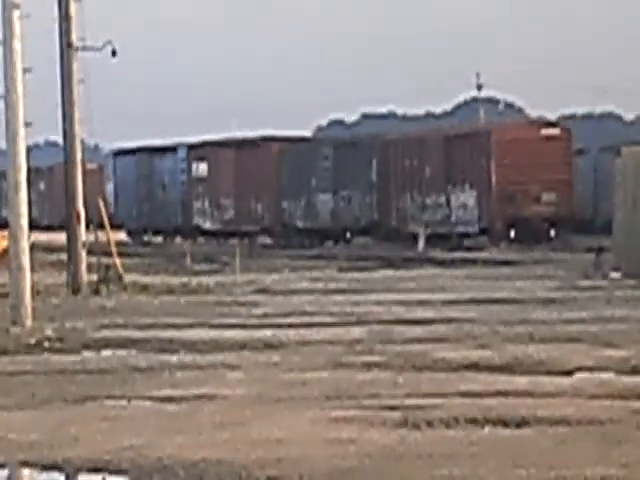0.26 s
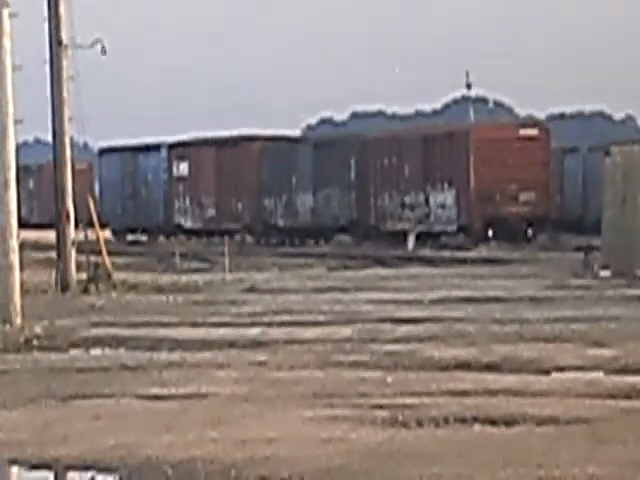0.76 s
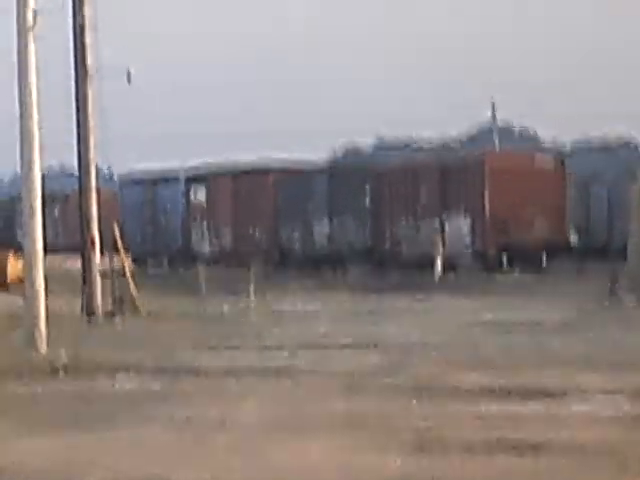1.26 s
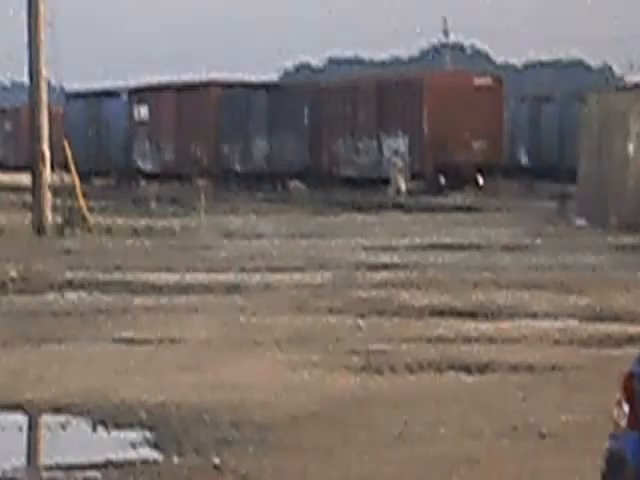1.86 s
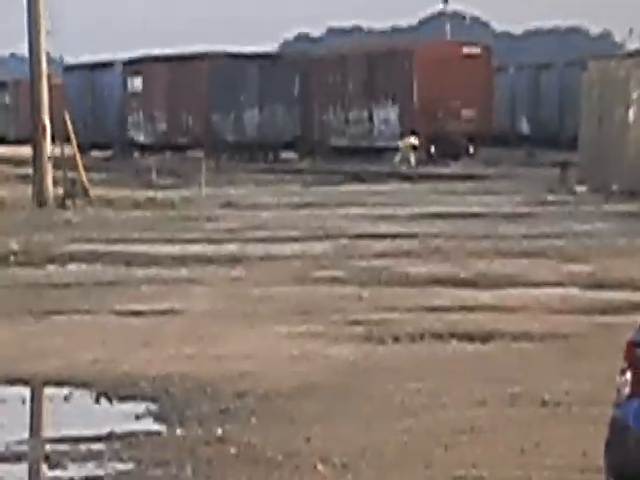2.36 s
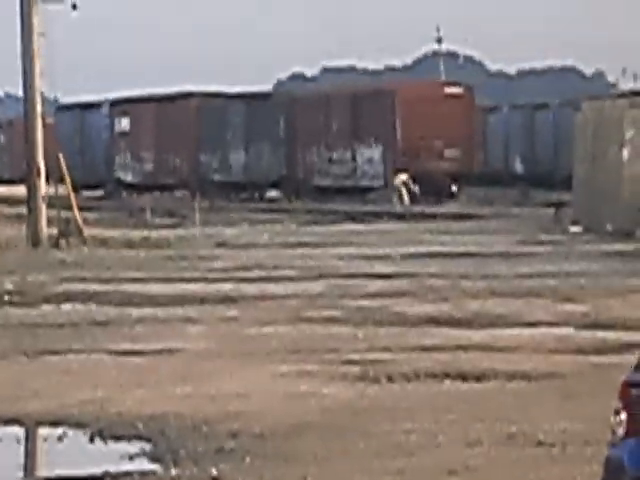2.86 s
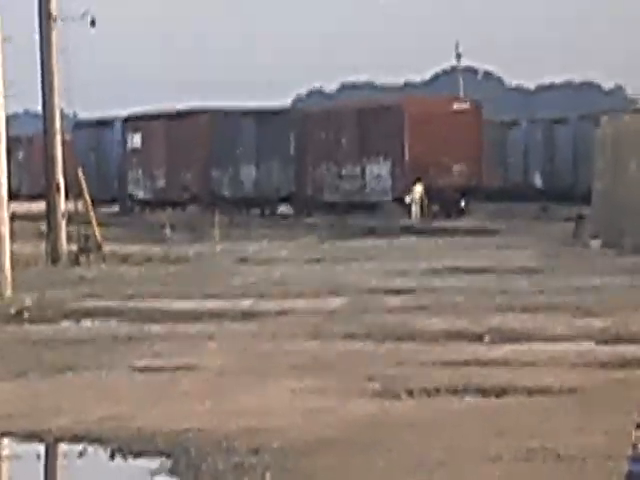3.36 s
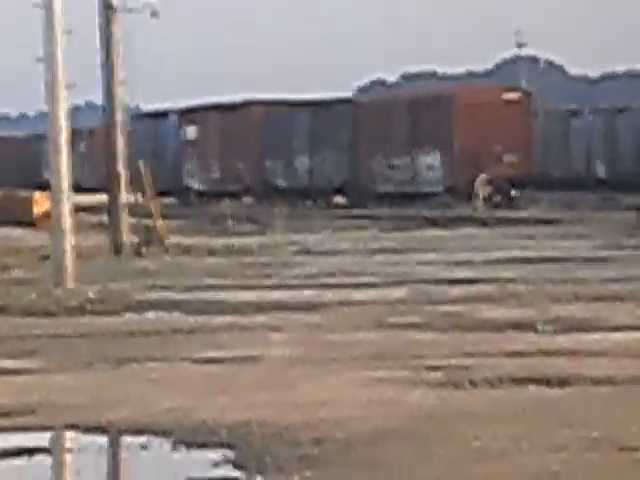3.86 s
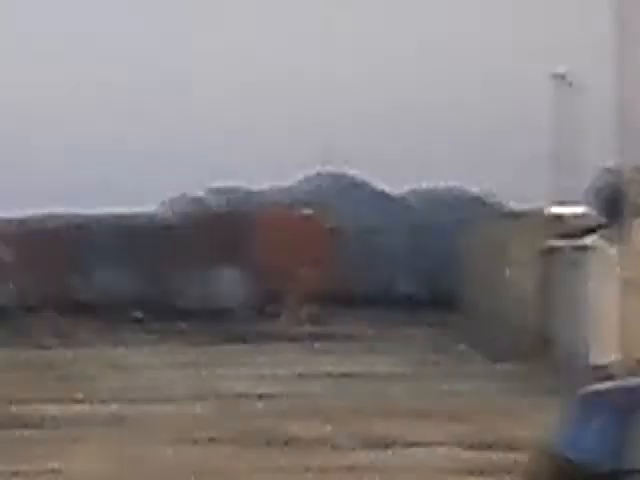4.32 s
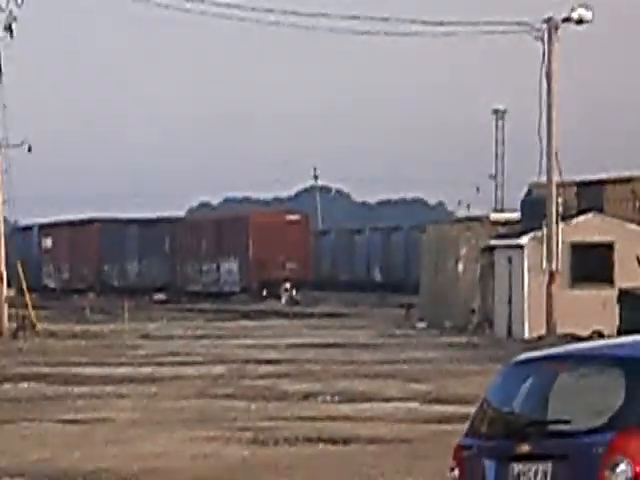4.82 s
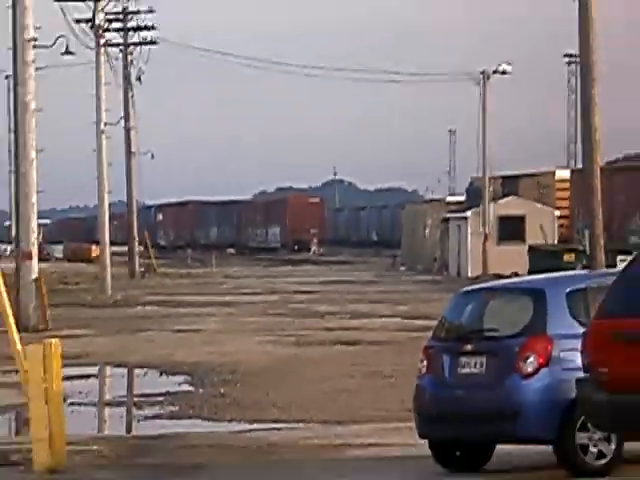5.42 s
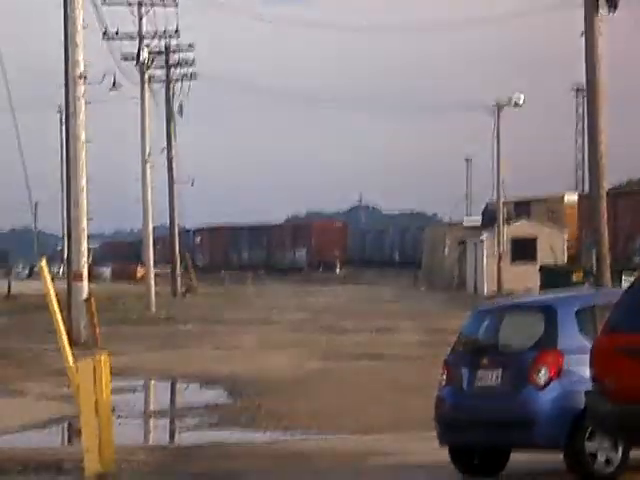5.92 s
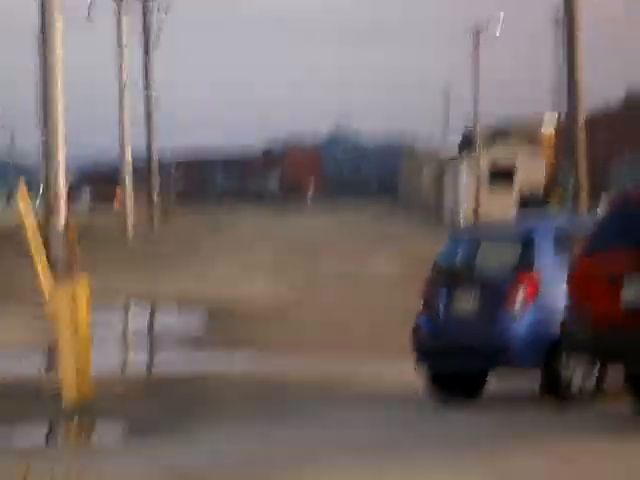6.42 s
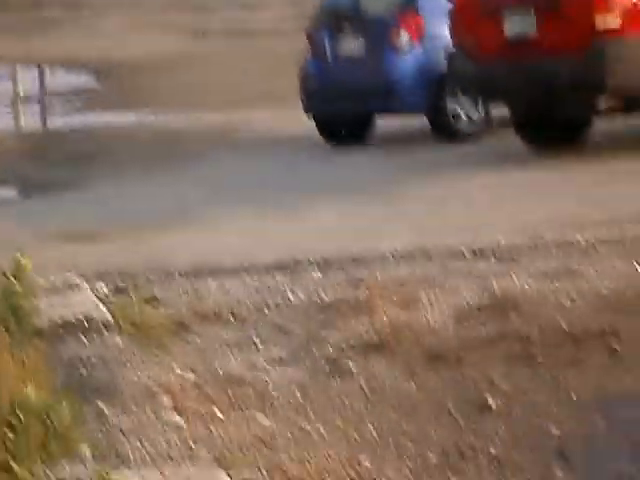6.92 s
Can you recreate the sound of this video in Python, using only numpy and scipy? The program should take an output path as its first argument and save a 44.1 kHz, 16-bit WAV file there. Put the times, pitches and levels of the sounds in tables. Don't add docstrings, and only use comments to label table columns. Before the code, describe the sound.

Steady beating diesel idle and high blower whine from a distant rail yard, with sparse dry handling clicks at the microphone, three of them loud.

```python
import sys
import numpy as np
from scipy import signal
from scipy.fft import rfft, irfft, next_fast_len
from scipy.io import wavfile
from scipy.ndimage import uniform_filter1d

SR = 44100
rng = np.random.default_rng(int(sys.argv[2]) if len(sys.argv) > 2 else 0)


def rack_gain(trim_db):
    fader = np.asarray(trim_db, float)
    return 10 ** (fader / 20)


def log_audio(samples):
    frames = np.atleast_2d(samples).T
    limited = np.clip(frames, -1, 1)
    pcm = np.round(limited * 32767).astype(np.int16)
    wavfile.write(sys.argv[1], SR, pcm)


N = 316638

# crank speed f/Hz, starting crank angle [turns], weak-order level/dB
ENGINES = [
    (5.1325, .0611, -1),
    (5.284, .0084, 1),
    (5.3945, -.0097, 0),
]
# multiple of crank speed [1], rms level/dB
SLOW_ORDERS = [(8, -41), (14, -46), (15, -33), (16, -39), (17, -43), (18, -46), (19, -47), (20, -42),
               (23, -47), (79, -47), (83, -42), (104, -47), (142, -46), (166, -42)]
MIDDLE_ORDERS = [(8, -31), (9, -43), (14, -46), (15, -31), (16, -38), (17, -35), (48, -45), (73, -44),
                 (79, -45), (144, -44), (157, -45), (158, -38), (226, -40), (242, -46)]
FAST_ORDERS = [(8, -34), (11, -43), (13, -44), (14, -38), (15, -41), (16, -34), (17, -34), (19, -41),
               (27, -44), (30, -43), (91, -46), (100, -44), (105, -44), (113, -40)]
# f/Hz, rms level/dB
WEAK_ORDERS = [(40, -48.5), (150, -54), (250, -57), (650, -51), (1000, -61), (1400, -61.5), (1800, -67.5),
               (4000, -82)]


def engine(turns_per_s, angle, weak_db, strong, scatter_db=2.5):
    size = 2 ** 14
    order = np.arange(size // 2 + 1)
    level_db = read(WEAK_ORDERS, order * turns_per_s) + weak_db
    level_db = level_db + scatter_db * rng.standard_normal(len(order))
    for k, db in strong:
        level_db[int(k)] = db
    phase = rng.random(len(order))
    phase[8] = 0
    heard = (order >= 8) & (order < 900)
    turn = irfft(heard * rack_gain(level_db) * np.exp(2j * np.pi * phase)) * size / np.sqrt(2)

    crank = angle + np.arange(N) / SR * turns_per_s + .0012 * drift(1.5)
    return np.interp(crank % 1 * size, np.arange(size + 1), np.append(turn, turn[0]))


# f/Hz, rms level/dB
WHINE = [(543.6, -38), (1087.4, -49), (1419.8, -46), (1468.2, -46), (1525, -43), (1619.9, -55), (2222, -54),
         (2287.4, -50), (2845.1, -54), (2840, -61), (2850.4, -62), (3006, -58), (3044.6, -56), (3050, -61)]
# f/Hz, crank speed f/Hz, [(sideband number [1], rms level/dB)]
MESHES = [
    (1491.27, 5.284, [(0, -34), (1, -46)]),
    (1522.56, 5.3945, [(-1, -49), (0, -35), (1, -41), (2, -41), (3, -54)]),
    (2980.1, 5.3945, [(-3, -59), (-2, -56), (0, -49), (1, -59), (2, -57), (3, -56), (4, -49), (5, -58), (6, -56)]),
]


def whine():
    t = .065 + np.arange(N) / SR + 1.5e-4 * drift(2.5)
    lines = list(WHINE)
    for hz, turns_per_s, bands in MESHES:
        lines += [(hz + k * turns_per_s, db) for k, db in bands]
    lag = 3.2e-4 * rng.standard_normal(len(lines))
    sway = [drift(2.4) for k in range(3)]
    tones = np.zeros(N)
    for k, (hz, db) in enumerate(lines):
        level = rack_gain(db + 0.92 * sway[k % 3])
        tones += level * np.cos(2 * np.pi * hz * t + hz * lag[k])
    return np.sqrt(2) * (tones + hums(t))


# t/s, peak level/dB, rattle length [s], low body level/dB, ring centre f/Hz
SNAPS = [
    (1.2424, 1.3, 0.0009, -6, 2600),
    (1.671, -19, 0.0043, -20, 3900),
    (1.738, -15, 0.0009, -21, 3700),
    (2.211, -16, .003, -14, 2300),
    (2.212, -16, 0.012, -27, 3900),
    (4.183, -14.5, .001, -26, 3860),
    (4.3677, 7.3, 0.0036, -5, 2600),
    (5.5231, 8, .0031, 0, 2500),
    (6.229, -4, .0002, -24, 2750),
]
# f/Hz, width [Hz], level/dB
SHELL_LOW = [(190, 370, -2.5), (736, 120, -0.5), (1116, 61, 2), (1600, 170, -7.5)]
# f/Hz, width [Hz], level/dB
SHELL_HIGH = [(1900, 230, 0), (2200, 900, -1.4), (2610, 100, -2), (3190, 1200, 0), (3190, 200, 0),
              (3990, 270, -1.5)]


def snaps():
    out = np.zeros(N)
    size, first = 2048, 14
    t = np.arange(size) / SR
    slips = rng.standard_normal((len(SNAPS), size))
    slips[:, first] -= 9
    for (s, db, rattle, low_db, centre_hz), slip in zip(SNAPS, slips):
        t60 = .0095 + 3.0 * rattle
        decay = rack_gain(-60 * np.maximum(t - rattle, 0) / t60)
        force = slip * np.minimum(t / 0.00057, 1) * decay
        no_slow_push = np.minimum(np.fft.rfftfreq(size, 1 / SR) / 250, 1)
        spectrum = rfft(force)
        white = spectrum * no_slow_push / uniform_filter1d(abs(spectrum), size=24)
        force = irfft(white) * (t < .03)
        push = rack_gain(-14) * force / abs(force).max()
        push[first] -= 1
        high = ring(force, SHELL_HIGH, centre_hz, 30)
        low = ring(push, SHELL_LOW, 700, 0)
        sound = high + rack_gain(low_db) * low
        at = round(s * SR)
        out[at:at + size] += rack_gain(db) * sound / abs(sound).max()
    return out


def ring(x, modes, centre_hz, focus_db):
    t = np.arange(1024) / SR
    shape = np.zeros(1024)
    for hz, width, db in modes:
        level = rack_gain(db - focus_db * np.log2(hz / centre_hz) ** 2) * width
        shape += level * np.exp(-np.pi * width * t) * np.sin(2 * np.pi * hz * t)
    sound = np.convolve(x, shape)[:len(x)]
    return sound / abs(sound).max()


# f/Hz, start t/s, full t/s, end t/s, rms level/dB
HUMS = [
    (440, 2.5, 2.7, 3.45, -35),
    (446, 3.3, 3.6, 4.0, -38),
    (1004, 6.45, 6.9, 7.6, -37),
]


def hums(t):
    out = np.zeros(N)
    for hz, start, full, end, db in HUMS:
        swell = np.interp(t, [start, full, end - .3, end], [0, 1, 1, 0])
        out += rack_gain(db) * swell * np.cos(2 * np.pi * hz * t)
    return out


# f/Hz, spectral density level/dB per Hz
WASH = [(30, -69.5), (80, -64.5), (170, -50.5), (330, -62.5), (600, -57.5), (1000, -58.5), (1520, -58),
        (1700, -75), (2250, -65), (2600, -78.5), (3000, -64.5), (3200, -72), (4050, -69), (4850, -83.5)]


def wash(patchy_db=1.5):
    frames, hz = N // 512 + 5, np.fft.rfftfreq(2048, 1 / SR)
    real, imaginary, patches = rng.standard_normal((frames, 1025, 3)).T
    patches = uniform_filter1d(patches, size=16, axis=0)
    patches = uniform_filter1d(patches, size=6, axis=1)
    level_db = read(WASH, hz)[:, None] + patchy_db * patches / patches.std()
    spectra = (real + 1j * imaginary) * rack_gain(level_db)
    return signal.istft(spectra, nperseg=2048, noverlap=1536)[1][:N] * rack_gain(13.0)


def yard():
    far = whine() + wash()
    for settings, strong in zip(ENGINES, (SLOW_ORDERS, MIDDLE_ORDERS, FAST_ORDERS)):
        far += engine(*settings, strong)
    size = next_fast_len(N)
    spectrum, hz = rfft(far, size), np.fft.rfftfreq(size, 1 / SR)
    spectrum *= np.clip((hz - 37) / 3, .45, 1)
    turned = np.interp(np.arange(N) / SR, [2.4, 6.6], [-.5, .5])
    bands = [(hz < 200, 0), ((hz >= 200) & (hz < 1600), -0.4), (hz >= 1600, -2)]  # dB, fully turned
    return sum(irfft(spectrum * band)[:N] * rack_gain(db * turned) for band, db in bands)


def read(points, hz):
    f, value = np.transpose(points)
    return np.interp(np.log(hz + 1), np.log(f + 1), value)


def drift(top_hz):
    t = np.arange(0, N / SR + .02, .01)
    hz = np.geomspace(.1, top_hz, 20)[:, None]
    wave = (np.sin(2 * np.pi * (hz * t + rng.random(hz.shape))) / np.sqrt(hz)).sum(0)
    return np.interp(np.arange(N) / SR, t, wave / wave.std())


def scene():
    return (yard() + snaps())[None]


def low_pass(x, edge_hz, order):
    size = next_fast_len(N + 999)
    hz = np.fft.rfftfreq(size, 1 / SR)
    padded = np.pad(x, ((0, 0), (0, size - N)), "reflect")
    return irfft(rfft(padded) / np.sqrt(1 + (hz / edge_hz) ** (2 * order)), size)[:, :N]


def duck(x, above_db=-8, share=0.21, recover_db_per_s=24.5):
    power_db = 10 * np.log10(abs(uniform_filter1d(x ** 2, size=200, origin=99)) + 1e-12)
    fall = np.arange(N) * recover_db_per_s / SR
    held_db = np.maximum.accumulate(power_db + fall, axis=1) - fall
    over_db = np.maximum(held_db - above_db, 0)
    return x * rack_gain(-share * uniform_filter1d(over_db, size=800, origin=399))


def roll_off(x):
    return signal.sosfilt(signal.butter(12, 11200, fs=SR, output="sos"), x)


def record(dry):
    dull = low_pass(low_pass(dry, 3620, order=6), 5030, order=60)
    level = duck(dull) - .0045
    knee = .92
    over = np.maximum(abs(level) - knee, 0) / (1 - knee)
    clipped = np.clip(level, -knee, knee) + np.sign(level) * (1 - knee) * np.tanh(over)
    narrow = low_pass(clipped, 10950, order=60)
    return roll_off(narrow)


dry = scene()
out = record(dry)
log_audio(out)
```